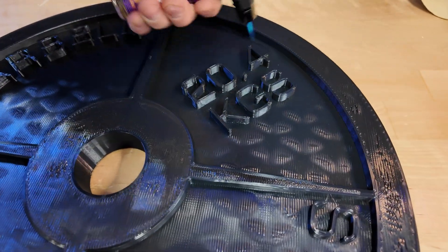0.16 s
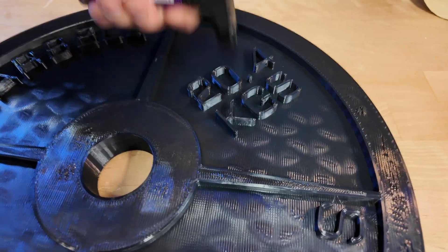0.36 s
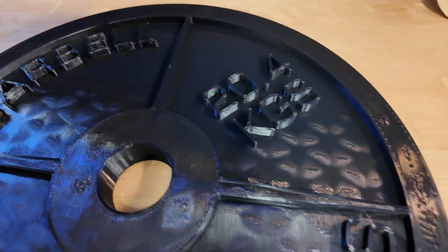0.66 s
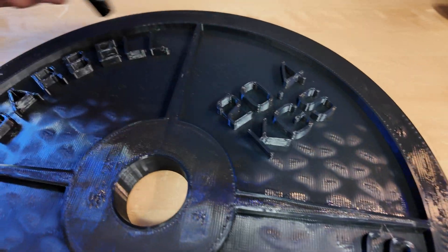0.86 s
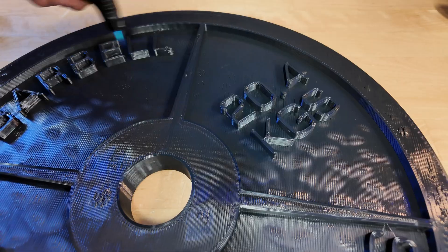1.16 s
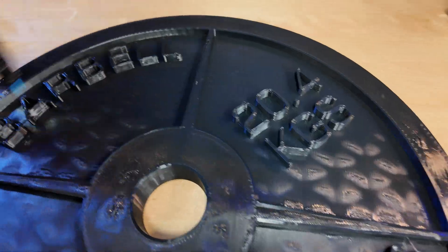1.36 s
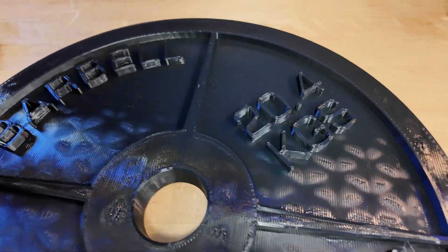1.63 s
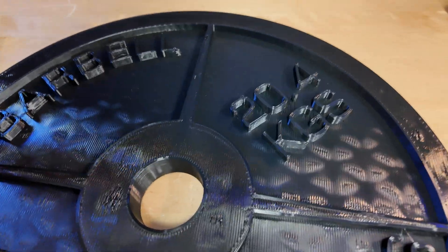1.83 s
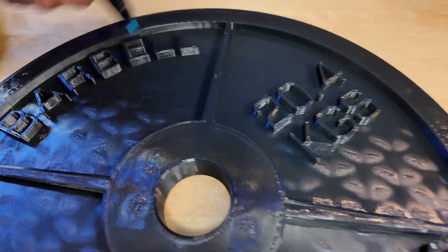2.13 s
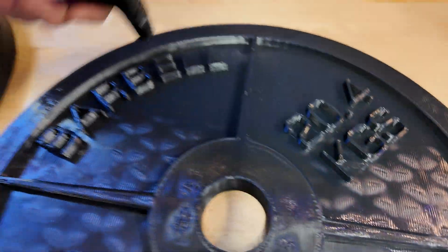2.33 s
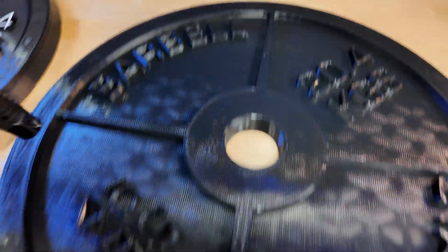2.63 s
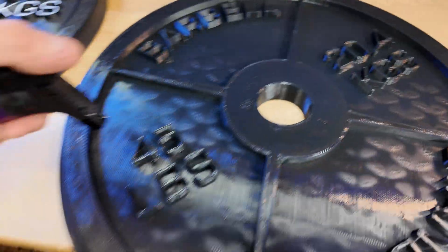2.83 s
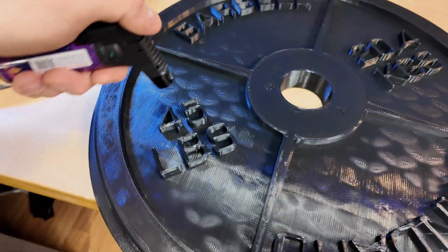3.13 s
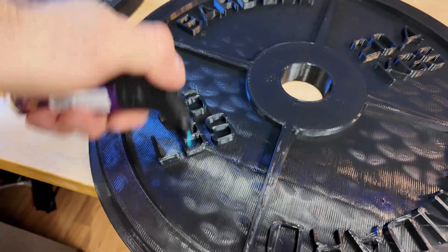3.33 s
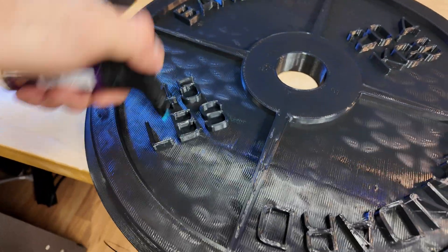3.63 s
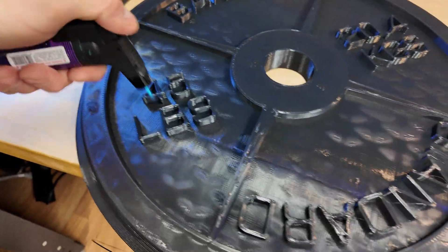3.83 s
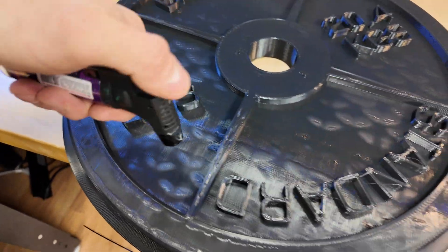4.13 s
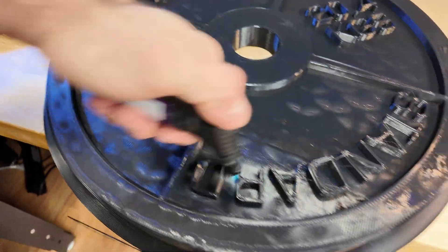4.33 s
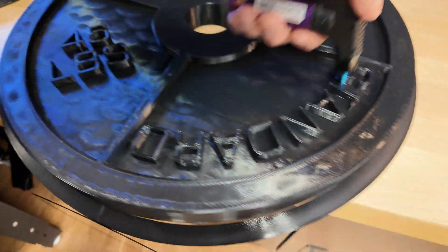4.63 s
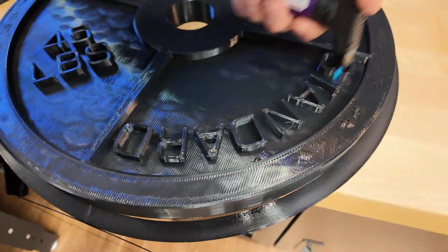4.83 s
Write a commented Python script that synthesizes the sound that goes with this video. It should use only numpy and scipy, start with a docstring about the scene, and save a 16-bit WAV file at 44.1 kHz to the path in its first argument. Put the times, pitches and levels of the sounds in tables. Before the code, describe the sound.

Close up in a small workshop, a gas torch lighter is fired in five short bursts. Loud, bright igniter snaps ring briefly in the room, followed by a much quieter hiss and rush that swells as the flame sweeps over plastic. Softer clicks mark the trigger's release. Between the third and fourth bursts, a plastic disc is turned on wood with a faint scrape. A fan hums quietly underneath.

```python
"""Torch lighter on a weight plate

A butane torch is fired in short bursts over a plastic weight plate on a workbench. Each press snaps the
piezo igniter and lights the gas with a soft pop; the jet hisses and the flame rushes on the plastic until
the trigger clicks back. The plate is bumped and turned once. A small, hard room rings over a fan hum."""
import sys
import numpy as np
from scipy import signal
from scipy.fft import rfft, irfft, next_fast_len
from scipy.io import wavfile
from scipy.ndimage import uniform_filter1d, map_coordinates

SR = 44100
rng = np.random.default_rng(int(sys.argv[2]) if len(sys.argv) > 2 else 0)


def to_wav(sig):
    """Store sig (one row per channel, or 1-D mono) as 16-bit WAV at the path in sys.argv[1].

    Samples outside -1..1 are clipped; the rate is SR.
    """
    pcm = np.clip(np.atleast_2d(sig), -1, 1) * 32767
    pcm = np.round(pcm).astype(np.int16)
    wavfile.write(sys.argv[1], SR, pcm.T)  # frames by channels


N = 219265
MS = 1e-3
T = np.arange(N) / SR
AGE = T[:SR * 3 // 4]  # seconds since a hit


def undb(db):
    """Decibels to gain."""
    return 10 ** (np.asarray(db) / 20)


def unit(x):
    """Scale to rms 1."""
    return x / np.sqrt(np.mean(x ** 2))


def unit_hit(x):
    """Scale a transient to the energy of one millisecond at rms 1."""
    return x / np.sqrt(np.sum(x ** 2) / (SR / 1000))


def fade(t60):
    """Exponential decay, 60 dB down after t60 seconds."""
    return np.exp(-np.log(1000) * AGE / t60)


def noise(size=N):
    """White noise."""
    return rng.standard_normal(size)


def wander(rate):
    """Smooth random modulation at rms 1, with rate new values a second."""
    hold = int(SR / rate)
    steps = np.repeat(noise(N // hold + 1), hold)
    return unit(uniform_filter1d(uniform_filter1d(steps, hold), hold)[:N])


def tone(hz, rate):
    """A narrow, wavering tone at rms 1."""
    phase = 2 * np.pi * hz * T
    return unit(wander(rate) * np.sin(phase) + wander(rate) * np.cos(phase))


def eq(x, curve, peak_hz=9000, peak_db=0):
    """Minimum-phase EQ through (f/Hz, level/dB) points, plus one broad bell."""
    n = 2 * next_fast_len(len(x))
    hz = np.maximum(np.arange(n // 2 + 1) * SR / n, 1)
    curve_hz, curve_db = np.transpose(curve)
    bell_db = peak_db * np.exp(-((hz - peak_hz) / 1100) ** 2)
    db = np.interp(np.log(hz), np.log(curve_hz), curve_db) + bell_db
    cepstrum = irfft(np.log(undb(db)))
    cepstrum[1:n // 2] *= 2
    cepstrum[n // 2 + 1:] = 0
    return irfft(rfft(x, n) * np.exp(rfft(cepstrum)))[:len(x)]


def noise_bed(curve):
    """Steady EQ'd noise at rms 1."""
    return unit(eq(noise(), curve))


def ring(modes, detune):
    """Decaying modes, slightly retuned by the grip at each hit."""
    out = np.zeros(len(AGE))
    for k, (hz, t60, db) in enumerate(modes):
        tuned_hz = hz * (1 + detune * rng.standard_normal())
        out += (-1) ** k * undb(db) * fade(t60) * np.sin(2 * np.pi * tuned_hz * AGE)
    return out


def contacts(envelope):
    """A spray of tiny impacts under an envelope, with a flat spectrum."""
    spray = noise(len(AGE)) * envelope
    for _ in range(2):
        whitened = irfft(np.exp(1j * np.angle(rfft(spray, 2 * len(AGE)))))
        spray = whitened[:len(AGE)] * np.sqrt(envelope / envelope.max())
    return spray


def add(out, s, x):
    """Mix x into out from s seconds on."""
    start = int(round(s * SR))
    a, b = max(start, 0), min(start + len(x), len(out))
    if b > a:
        out[a:b] += x[a - start:b - start]


# Room air: f/Hz, level/dB
AIR_EQ = [(20, -32.5), (40, -17), (75, -11), (130, -2), (220, -12.5), (450, -10.5), (700, -14.5),
          (1000, -19), (1850, -19), (2300, -20), (5000, -24.5), (8500, -28), (12000, -38), (16000, -49)]
# Fan tones: f/Hz, level/dB
FAN_TONES = [(129, -79), (301, -78.5), (452, -75.5), (667, -82.5), (1830, -83), (3526, -88.5)]


def room_tone():
    """A bed of steady air under the wavering hum of a fan."""
    hum = sum(undb(db) * tone(hz, rate=12 + hz / 50) for hz, db in FAN_TONES)
    return noise_bed(AIR_EQ) * undb(-62.06 + 0.31 * wander(8.3)) + hum


def sway(hiss, depth_db, rate, bands=22):
    """A beam of hiss swings past the listener, so each band swells and fades on its own."""
    spectrum = rfft(hiss)
    place = np.linspace(0, bands, len(spectrum))
    shares = (np.maximum(1 - np.abs(place - k), 0) for k in range(bands))
    return sum(irfft(spectrum * share, N) * undb(depth_db * wander(rate)) for share in shares)


# Gas bursts: valve open/s, shut/s, unlit gas/dB, lit jet/dB, rush on flat plastic/dB, whistle re rush/dB
GAS_BURSTS = [(-0.1, 0.428, -68, -71, -58.5, -8), (1.055, 1.685, -65.5, -67.3, -57.5, -21.5),
              (1.913, 2.313, -70.5, -68.5, -58.5, -16), (3.262, 3.998, -67, -70.5, -60, -27.5),
              (4.335, 5.107, -70, -71, -59, -27)]
# Swells as the flame sweeps a raised edge: centre t/s, boost/dB, length/s
EDGE_SWELLS = [(0.254, 5, .16), (1.482, 4.5, 0.11), (2.166, 6, 0.11), (3.578, 9, 0.11), (3.739, 9, 0.059),
               (3.82, 7, 0.046), (4.699, 2.5, .16)]
# Thin hiss of unlit gas: f/Hz, level/dB
UNLIT_EQ = [(500, -10.5), (4000, -5), (6000, -3), (7600, 2.5), (10000, 1.5), (12000, -7), (14000, -8.5),
            (15700, -2)]
# Hiss of the lit jet: f/Hz, level/dB
JET_EQ = [(100, -19.5), (800, -6), (1800, -1.5), (4000, 1), (5500, -7), (7500, -1.5), (9600, -10.5),
          (11200, -4), (12800, 3), (14200, -1), (16000, -4.5)]
# Body of the flame rushing on plastic: f/Hz, level/dB
RUSH_EQ = [(20, -33.5), (80, -11), (250, -0.5), (550, 4.5), (900, -2.5), (1300, 0.5), (1800, -2),
           (2500, -6), (3400, -15.5), (4500, -18), (7500, -26.5), (10000, -30), (15000, -32)]
# Sizzle of the flame splitting on an edge: f/Hz, level/dB
SIZZLE_EQ = [(100, -30.5), (1500, -10), (3000, 2), (4500, -3.5), (7500, -10.5), (10000, -13.5),
             (15000, -20)]


def torch():
    """Gas hisses as the valve opens; lit, it rushes and whistles, louder and brighter on raised edges."""
    echo_ms, echo_gain = 1.1, 0.21
    flatness = 2.3  # 2 is a bell-shaped swell, more flattens the top
    swell_db = sum(db * np.exp(-np.abs(2 * (T - s) / length) ** flatness)
                   for s, db, length in EDGE_SWELLS)
    rush = noise_bed(RUSH_EQ) * undb(1.18 * wander(70))
    sizzle = noise_bed(SIZZLE_EQ)
    whistle = tone(1865, rate=70)  # from the nozzle
    jet = sway(noise_bed(JET_EQ), depth_db=3, rate=14)
    unlit = noise_bed(UNLIT_EQ)
    out = np.zeros(N)
    for (opens, shuts, unlit_db, jet_db, flat_db, whistle_db), (spark_s, *_) in zip(GAS_BURSTS, SNAPS):
        # after the valve shuts, the sound dies away with the room
        valve = np.clip((T - opens) / .012, 0, 1) * np.exp(-np.maximum(T - shuts, 0) / 0.017)
        alight = np.clip((T - spark_s) / 0.063, 0, 1)
        rush_db = flat_db + swell_db
        sizzle_db = -56.5 + 2.2 * (rush_db + 50)  # climbs 2.2 dB per dB of rush
        flame = valve * alight * undb(rush_db) * (rush + undb(whistle_db) * whistle)
        # the echo off the plate combs the flame, and the teeth shift as the hand moves
        lag = echo_ms * MS * SR * (1 + 0.038 * wander(5))
        echo = echo_gain * map_coordinates(flame, [np.arange(N) - lag], order=3)
        lit_hiss = alight * (undb(jet_db) * jet + undb(sizzle_db) * sizzle)
        unlit_hiss = (1 - alight) * undb(unlit_db) * unlit
        out += flame + echo + valve * (lit_hiss + unlit_hiss)
    return out


def early_reflections(x, wet):
    """Echoes from the bench and shelves ripple the spectrum of a steady sound."""
    echoes = noise(len(AGE)) * fade(.12) * (AGE > .002)
    reflected = signal.fftconvolve(x, echoes / np.linalg.norm(echoes))[:N]
    return (x + wet * reflected) / np.hypot(1, wet)


# Reverb time of the room: f/Hz, t60/s
ROOM_DECAY = [(200, 0.48), (1500, 0.39), (4000, 0.58), (7500, 0.5), (11000, 0.35), (15000, 0.18)]


def room_tail(curve, peak_hz, peak_db):
    """Diffuse tail of a click: it blooms within milliseconds and the top end dies first."""
    spectrum = rfft(unit(eq(noise(len(AGE)), curve, peak_hz, peak_db)))
    hz = np.arange(len(spectrum)) * SR / len(AGE)
    centres, t60s = np.transpose(ROOM_DECAY)
    shares = (np.interp(hz, centres, band) for band in np.eye(len(t60s)))
    tail = sum(irfft(spectrum * share, len(AGE)) * fade(t60) for share, t60 in zip(shares, t60s))
    return tail * (1 - np.exp(-AGE / 0.0069))


# Igniter snaps: t/s, level/dB, rebound lag/ms, rebound re snap/dB, rattle re snap before its lift/dB,
# case ring re snap/dB, spring f/Hz, spring boost/dB, pop/dB, room tail/dB
SNAPS = [(-0.030, -31, 2.4, -5, -12, -10, 7500, 1, -42, -32),
         (1.143, -12.5, 1.84, -1, -16.5, -14, 7630, 7, -35, -32),
         (1.9629, -16.5, 3.1, 1, -15, -7.5, 8800, 0, -34, -32),
         (3.3292, -15.5, 0.76, -4, -7, -6.5, 8000, 0, -35.5, -32.5),
         (4.4542, -13, 3.7, -9, -12.5, -7.5, 10360, 5.5, -36.5, -32.5)]
# Bright crack of the hammer: f/Hz, level/dB
CRACK_EQ = [(20, -52), (300, -22), (850, -33.5), (1500, -20.5), (2300, -14), (2900, -15), (4300, -13.5),
            (6000, -11), (6900, -3), (8000, -0.5), (10000, -3), (11200, -10), (14000, -15), (16000, -23.5)]
# Ring of the case and nozzle: f/Hz, t60/s, level/dB
CASE_MODES = [(2287, 0.026, -13), (3360, .05, -7), (4444, 0.015, -4.5), (5520, .025, -15.5),
              (6970, 0.015, -1.5), (6760, 0.037, -7), (7980, 0.029, -5), (9610, .02, 0.5),
              (9570, 0.017, -5.5)]
# The snap as the room returns it: f/Hz, level/dB
SNAP_TAIL_EQ = [(20, -45), (150, -13), (900, -20.5), (2200, -12.5), (2900, -13.5), (3450, -6),
                (3900, -13.5), (5200, -7), (6900, -0.5), (8200, -0.5), (10500, -3), (12500, -8),
                (15500, -15.5)]


def igniter():
    """The hammer hits the crystal and rebounds, the case rings and rattles, the gas lights with a pop."""
    rattle_lift_db = 5.5
    out = np.zeros(N)
    for s, db, rebound_ms, rebound_db, rattle_db, ring_db, spring_hz, spring_db, pop_db, tail_db in SNAPS:
        for lag_ms, hit_db in ((0, db), (rebound_ms, db + rebound_db)):
            envelope = fade(0.0091) * (1 - np.exp(-AGE / 0.00063))
            crack = unit_hit(eq(contacts(envelope), CRACK_EQ, spring_hz, spring_db))
            case = undb(ring_db) * unit_hit(ring(CASE_MODES, detune=.008))
            add(out, s + lag_ms * MS, undb(hit_db) * (crack + case))
        # loose plastic parts rattle on, with more body than the steel hammer
        rattle = eq(contacts(fade(0.017) * AGE), CRACK_EQ, peak_hz=1900, peak_db=3.5)
        add(out, s + 0.0035, undb(db + rattle_db + rattle_lift_db) * unit_hit(rattle))
        add(out, s + 0.0018, undb(pop_db) * gas_pop())
        add(out, s, undb(tail_db) * room_tail(SNAP_TAIL_EQ, spring_hz, .3 * spring_db))
    return out


def gas_pop():
    """The flame front shoves the air, which swings back once or twice."""
    thump = np.sin(2 * np.pi * 122 * AGE) * fade(0.037)
    punch = 0.692 * np.sin(2 * np.pi * 290 * AGE) * fade(0.013)
    return signal.sosfilt(signal.butter(2, 85, "high", fs=SR, output="sos"), thump + punch)


# Trigger releases: t/s, click before its lift/dB, latch lag/ms, latch re click/dB,
# spring f/Hz, spring boost/dB, grip ring/dB, room tail/dB
TRIGGER_CLICKS = [(0.466, -41.5, 2.8, 0.5, 8600, 10.5, -52, -54.5),
                  (1.7287, -45.5, 2.37, 0, 10100, 2, -51.5, -58.5),
                  (2.3335, -40.5, 1.406, -3, 9660, 11.5, -45, -54),
                  (4.0053, -45.5, 2.9, -2, 8880, 11, -41.5, -59.5)]
# Trigger click and its tail: f/Hz, level/dB
CLICK_EQ = [(200, -5), (600, -7.5), (1100, 2.5), (1700, -6.5), (2800, -5.5), (3450, 2), (4100, -6.5),
            (5400, -2), (7000, -2), (10000, -3.5), (12500, -14.5), (15500, -20)]
# Ring of the plastic grip and spring: f/Hz, t60/s, level/dB
GRIP_MODES = [(1090, 0.02, 3.5), (1910, 0.016, 6), (3540, 0.057, -2), (5470, .07, -9), (6370, .025, -10),
              (10240, .07, -6)]


def trigger():
    """The trigger springs back and latches with a double click that rings the grip."""
    lift_db = 4
    out = np.zeros(N)
    for s, db, latch_ms, latch_db, spring_hz, spring_db, grip_db, tail_db in TRIGGER_CLICKS:
        for lag_ms, hit_db in ((0, db), (latch_ms, db + latch_db)):
            envelope = fade(0.029) * (1 - np.exp(-AGE / 0.00033))
            click = eq(contacts(envelope), CLICK_EQ, spring_hz, spring_db)
            add(out, s + lag_ms * MS, undb(hit_db + lift_db) * unit_hit(click))
        add(out, s, undb(grip_db) * unit_hit(ring(GRIP_MODES, detune=0.015)))
        add(out, s, undb(tail_db) * room_tail(CLICK_EQ, spring_hz, 0.56 * spring_db))
    return out


# Handling ticks: t/s, level/dB
GRIP_TICKS = [(0.838, -63), (1.024, -60), (1.036, -59), (1.865, -64), (2.5157, -54), (3.1401, -51),
              (3.1428, -49.5), (4.207, -62)]
# Thin, bright tick of plastic: f/Hz, level/dB
TICK_EQ = [(500, -21.5), (3000, -9.5), (5000, 6.5), (10000, 5), (15000, -20.5)]


def handling():
    """The plastic grip ticks lightly in the hand."""
    out = np.zeros(N)
    for s, db in GRIP_TICKS:
        add(out, s, undb(db) * unit_hit(eq(contacts(fade(0.006)), TICK_EQ)))
    return out


# Body of the scrape on wood: f/Hz, level/dB
SCRAPE_EQ = [(60, -14), (300, 10), (900, 0), (1800, 4.5), (3000, 0), (4500, -3), (6500, -18), (10000, -24),
             (15000, -27)]
# Its gritty top end: f/Hz, level/dB
GRIT_EQ = [(1000, -10), (4000, 4.5), (7500, -1), (11000, -6), (15000, -18)]


def plate_scrape():
    """The plate jerks into a turn and scrapes over the wood, grittier as it comes to rest."""
    start_s, grit_full_s, stop_s = 2.635, 3.045, 3.09
    attack_s, release_s = .045, .025
    moving = np.clip((T - start_s) / attack_s, 0, 1) * np.exp(-np.maximum(T - stop_s, 0) / release_s)
    scrape_db = -62 - 12 * np.maximum(T - start_s, 0)  # sags 12 dB/s
    grit_db = -65.5 - 55 * np.maximum(grit_full_s - T, 0)  # builds 55 dB/s
    rub = undb(scrape_db) * noise_bed(SCRAPE_EQ) + undb(grit_db) * noise_bed(GRIT_EQ)
    return rub * moving * undb(0.6 * wander(50))


# Bumps on the bench: t/s, peak before its lift/dB, contact/ms
PLATE_BUMPS = [(2.66, -51.5, 1.05), (2.691, -49, 2.7), (2.718, -53.5, 3)]
# Low ring of the plate: f/Hz, t60/s, level/dB
PLATE_MODES = [(142.4, .2, 4), (192, 0.1, -0.5), (300, .07, 1.5), (444, 0.074, 0.5), (660, 0.067, 1)]


def plate_knocks():
    """The plate bumps the bench; a softer contact pushes for longer and leaves only the low modes."""
    lift_db = 4
    out = np.zeros(N)
    for s, db, contact_ms in PLATE_BUMPS:
        push = np.hanning(int(contact_ms * MS * SR) + 2)
        knock = signal.fftconvolve(ring(PLATE_MODES, detune=0.018), push)
        add(out, s, undb(db + lift_db) * knock / np.abs(knock).max())
    return out


def scene():
    """The mono mix, heard from above the bench."""
    lighter = early_reflections(torch(), wet=.5) + igniter() + trigger() + handling()
    return (room_tone() + lighter + plate_scrape() + plate_knocks())[None]


def record(dry):
    """A steep low-pass trims the very top."""
    cutoff_hz = 15720
    return signal.sosfilt(signal.ellip(10, .2, 80, cutoff_hz, fs=SR, output="sos"), dry)


dry = scene()
out = record(dry)
to_wav(out)
```